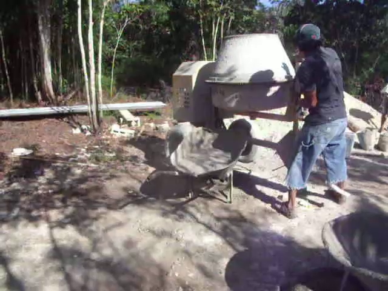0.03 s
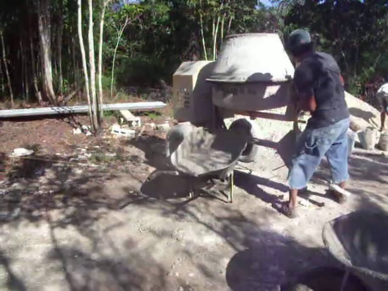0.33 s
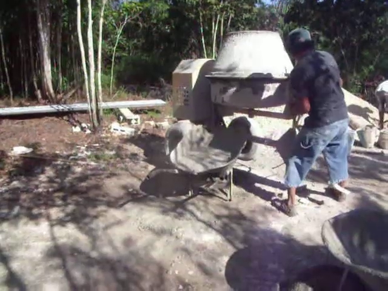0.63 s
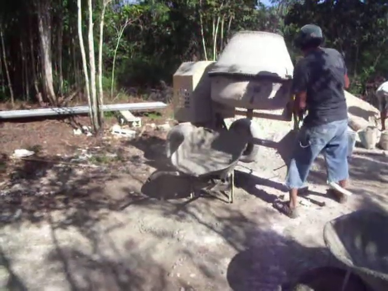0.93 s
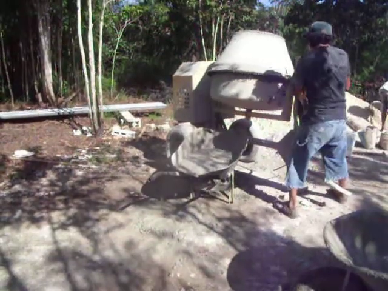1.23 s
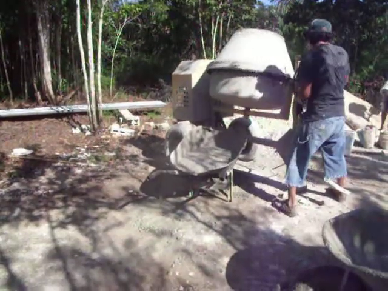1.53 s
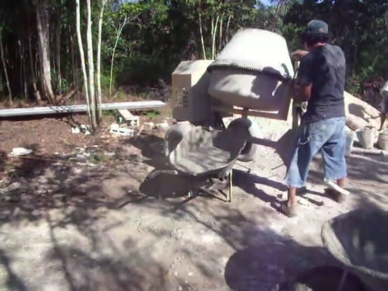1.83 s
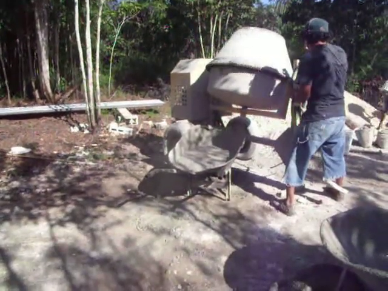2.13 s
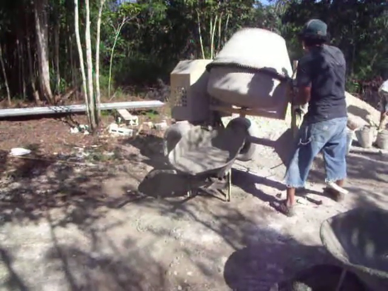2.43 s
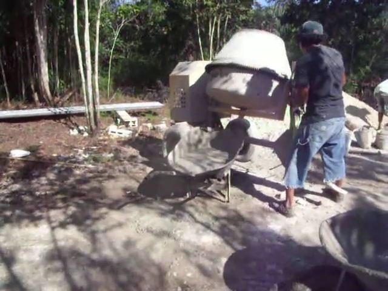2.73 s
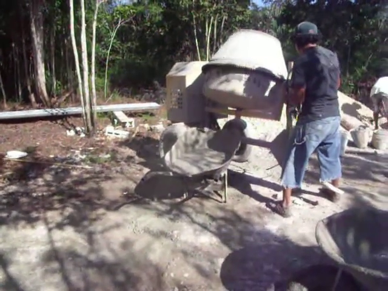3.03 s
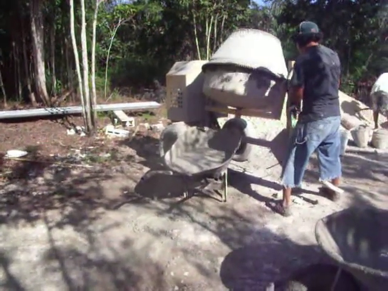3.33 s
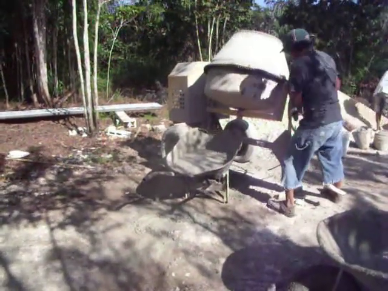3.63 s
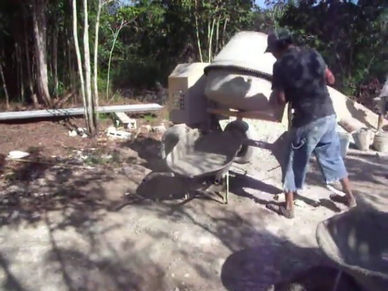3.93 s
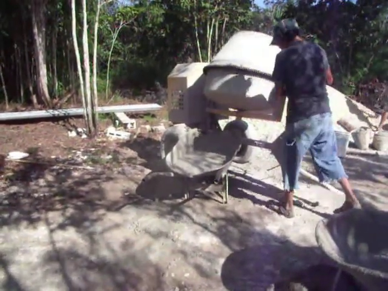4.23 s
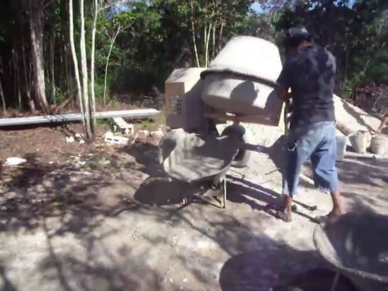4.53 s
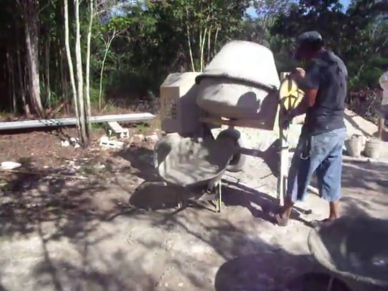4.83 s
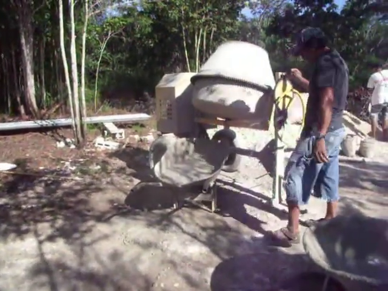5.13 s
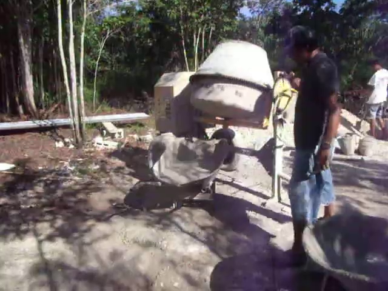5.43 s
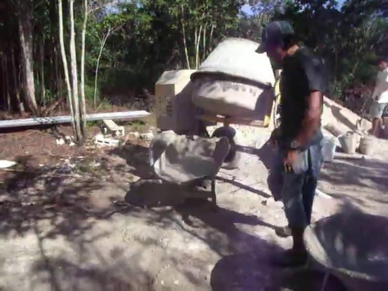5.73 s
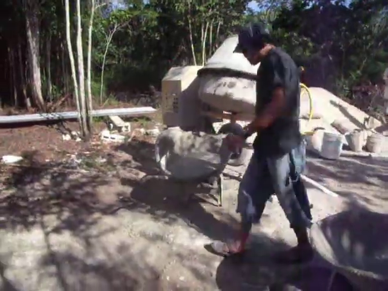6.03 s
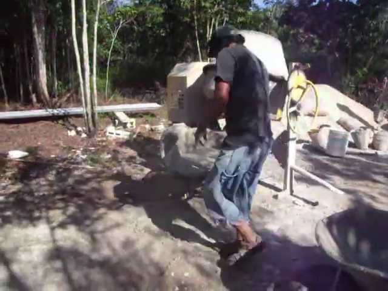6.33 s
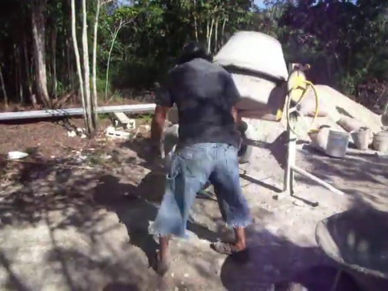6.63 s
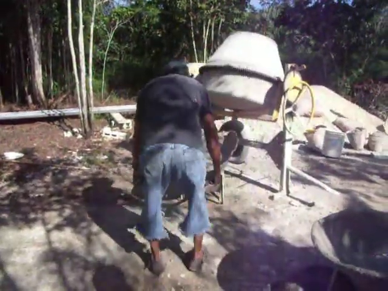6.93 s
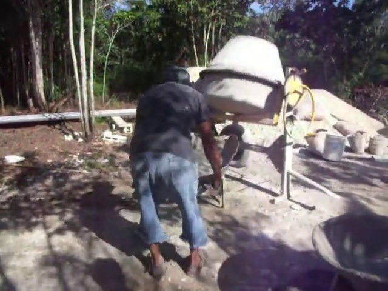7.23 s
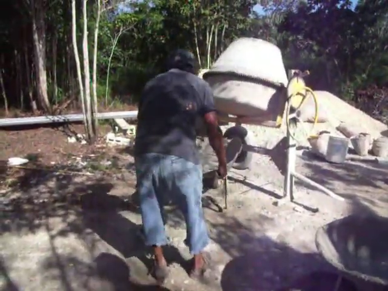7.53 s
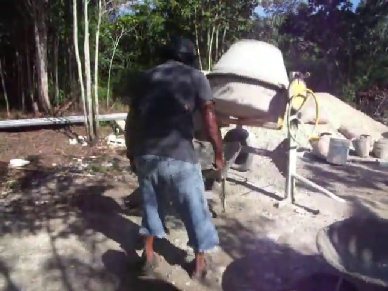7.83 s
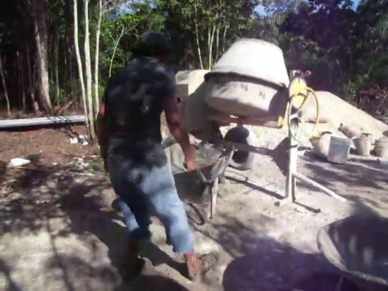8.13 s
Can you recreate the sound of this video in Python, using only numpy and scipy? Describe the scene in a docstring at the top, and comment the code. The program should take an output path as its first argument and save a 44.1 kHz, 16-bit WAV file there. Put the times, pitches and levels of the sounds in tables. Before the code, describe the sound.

The rapid, steady thud and tick of a small petrol engine turns a concrete mixer in the open air, over a faint low rumble. Dry metal clanks and rattles come unevenly from its ring gear. Roughly every three seconds the load shifts: gravel hisses over steel, then wet concrete slaps and lands with a deep rumble. One lump crashes hard against the drum, and a softer wet one follows later. The small microphone sounds slightly dull.

```python
"""First you hear the fast thud and tick of a one-cylinder petrol engine: a concrete mixer, outdoors.
Its loose ring gear, the toothed band that turns the steel drum, chatters and clanks.
As the drum turns, gravel slides, then wet concrete slops off the blades, thumps down and sets the
shell droning. Two lumps knock on the bare wall, and a low outdoor rumble lies under it all."""
import sys
import numpy as np
from scipy import signal
from scipy.fft import rfft, irfft
from scipy.io import wavfile
from scipy.ndimage import uniform_filter1d

SR = 44100
rng = np.random.default_rng(int(sys.argv[2]) if len(sys.argv) > 2 else 0)


def put_to_file(sound):
    """Save the sound as 16-bit audio at rate SR, in the file named by the first command-line argument."""
    columns = np.atleast_2d(sound).T  # one column per channel
    safe = np.clip(columns, -1, 1)
    whole_steps = np.round(safe * 32767)
    wavfile.write(sys.argv[1], SR, whole_steps.astype(np.int16))


N = 369558
T = np.arange(N) / SR


# Hum of the shaking frame: (multiple of the crank speed, level/dB before the load adds to it)
FRAME_HUM = [(2, -47), (4, -46.5), (5, -42), (6, -48), (9, -45)]
# Tone of the valve ticks: (f/Hz, relative level/dB)
VALVE_TONE = [(200, -10.5), (480, -4), (600, 2), (900, 0.5), (1120, 0), (1700, -1), (3100, -2.5),
              (3800, -7), (5300, -14)]
def engine(load_db=-24):
    """The engine thuds, hums, whines and ticks, and keeps the drum faintly ringing."""
    cycle = firing_count()
    crank = 2 * np.pi * 2 * cycle  # the crankshaft turns twice per firing
    hum = sum(level(np.sin(round(k) * crank + 0.45 * wander(5.2)) * undb(2.0 * wander(7.7)), db)
              for k, db in FRAME_HUM)
    teeth = 2 * np.pi * 37 * cycle  # 37 gear teeth meet per firing
    whine = level(np.sin(teeth + 1.4 * wander(14)) * undb(2.4 * wander(5.9)), -43.5)
    valves = np.exp(-((cycle - .24) % 1) / 0.56)  # jumps up and fades once a cycle
    ticks = grains(per_s=5000, spread_db=2) * (.7 + valves)
    clatter = through(level(ticks, -27.5), colour(VALVE_TONE))
    ringing = level(through(rng.standard_normal(N), steel(contact_db=-15.5)), -43.5)
    effort = 1 + landing() / undb(load_db)  # it beats harder as the load lands
    return (exhaust(cycle) + hum) * effort + whine + clatter + ringing


# Pitches at which the silencer booms: (f/Hz, width/Hz, relative level/dB)
SILENCER_BOOMS = [(61.5, 72, -9.5), (129.5, 140, 0.5), (197, 40, 5.5), (260, 60, -18)]
def exhaust(cycle, scatter_db=1.0, jitter_s=0.00033, puff_s=0.00089, lead_s=0.0019, echo_s=0.0158):
    """Each firing sends a soft puff of gas booming through the silencer; a weak echo follows."""
    firings = T[1:][np.diff(np.floor(cycle)) > 0]
    puffs, t = np.zeros(N), T[:SR // 50]
    for s, (late, size) in zip(firings, rng.standard_normal((len(firings), 2))):
        puff = -undb(scatter_db * size) * t * np.exp(-t / puff_s)
        start = s - lead_s + jitter_s * late
        add(puffs, start, puff)
        add(puffs, start + echo_s, undb(-11) * puff)
    boom = sum(undb(db) * signal.lfilter(*signal.iirpeak(hz, hz / width, fs=SR), puffs)
               for hz, width, db in SILENCER_BOOMS)
    return level(boom, -33.5)


# How often the engine fires: (t/s, f/Hz)
FIRING_RATE = [(0, 15.5), (.6, 15.41), (1.2, 15.34), (1.8, 15.62), (2.39, 15.34), (2.99, 15.43),
               (3.59, 15.3), (4.19, 15.44), (4.79, 15.43), (5.39, 15.5), (5.99, 15.22), (6.58, 15.47)]
def firing_count():
    """Count the engine's cycles so far, starting partway through one."""
    rate_hz = np.interp(T, *np.transpose(FIRING_RATE))
    return .18 + np.cumsum(rate_hz) / SR


# Blows of the ring gear on the small gear driving it: (loudest t/s, level/dB, favoured f/Hz)
TOOTH_BLOWS = [(0.5617, -17.5, 1940), (0.643, -17.5, 2040), (0.7828, -14.0, 1957), (0.8557, -18, 1920),
               (0.8832, -14, 2250), (0.9155, -12.5, 2130), (0.9647, -13.0, 2280), (0.98, -15.0, 2300),
               (0.991, -9.5, 2000), (0.997, -12.0, 2050), (1.1069, -18.5, 1940), (1.2283, -15.0, 1590),
               (1.413, -19.5, 1720), (1.4676, -18.5, 1850), (1.5387, -15, 1650), (1.9492, -16.5, 1800),
               (2.1153, -19.0, 1800), (2.14, -20, 1680), (2.217, -19.5, 1800), (2.2446, -19.0, 1630),
               (2.439, -19, 1680), (2.548, -15.5, 1970), (2.6805, -21.0, 1900), (2.9255, -17.5, 1950),
               (3.0159, -14.5, 1830), (3.0496, -20, 2040), (3.0845, -16, 1770), (3.1862, -19, 1740),
               (3.3211, -14, 2300), (3.4127, -17.0, 1700), (3.435, -17.5, 2030), (3.4998, -16.0, 1940),
               (3.567, -17, 2270), (3.581, -17.5, 2100), (3.6757, -17.0, 1900), (3.6942, -17, 1870),
               (3.7107, -15.5, 1960), (3.7734, -13.5, 1730), (3.8528, -16.5, 1810), (3.9705, -21.5, 1830),
               (4.1332, -20.5, 1830), (4.1625, -18.0, 2210), (4.1887, -16.0, 1820), (4.5526, -17.5, 1800),
               (4.7027, -11.0, 1610), (4.7199, -11.5, 2110), (4.848, -11, 1960), (4.935, -20.5, 1750),
               (4.9607, -19, 1900), (5.0599, -18.5, 1930), (5.138, -17.0, 1970), (5.36, -18.5, 1990),
               (5.4211, -15.0, 1600), (5.4918, -16.5, 1790), (5.4996, -17.5, 2050), (5.5267, -12.5, 1835),
               (5.5888, -17.5, 1770), (5.6311, -19.0, 2000), (5.7013, -19, 1740), (5.713, -13.0, 1670),
               (5.7815, -18, 1780), (6.0387, -16, 1730), (6.1056, -12.5, 2230), (6.1305, -17, 1820),
               (6.1515, -16, 2220), (6.3912, -17.0, 1770), (7.1112, -15.0, 1870), (7.1807, -19.5, 1770),
               (7.3153, -15.5, 2070), (7.3471, -16.5, 1930), (7.5768, -15.5, 1910), (7.7214, -17, 1940),
               (8.004, -13.0, 1810)]
def clanks(grind_s=.0022, lead_s=0.001005, settle_s=0.042, settle_db=-14, treble_hz=2700):
    """A gear tooth hits, grinds in for a few milliseconds and buzzes as it settles."""
    out, t, drum = np.zeros(N), T[:SR // 7], steel(contact_db=3.5)
    treble_filter = signal.butter(2, treble_hz, "high", fs=SR, output="sos")
    for s, db, hz in TOOTH_BLOWS:
        harder_db = db + 18  # compared with a middling blow
        rise_s = grind_s * np.exp(0.0924 * harder_db)  # harder blows grind longer
        grind = (t / rise_s * np.exp(1 - t / rise_s)) ** 2
        buzz = undb(settle_db) * np.exp(-t / settle_s)
        blow = through((grind + buzz) * rng.standard_normal(len(t)), drum)
        # each spot on the ring favours its own pitch
        spot = signal.lfilter(*signal.iirpeak(hz, Q=5.4, fs=SR), blow)
        # harder and higher blows sound brighter
        bright_db = 0.5 + 0.22 * harder_db + 4 * np.log2(hz / 1850)
        treble = signal.sosfiltfilt(treble_filter, blow)
        blow = blow + 1.8 * spot + (undb(bright_db) - 1) * treble
        strength = np.std(blow[:SR // 83])  # over the first 12 ms
        add(out, s - rise_s - lead_s, blow * undb(db) / strength)
    return out


# Bursts of gear chatter: (start t/s, length/s, level/dB)
CHATTER_BURSTS = [(0.283, 0.086, -28), (0.536, 0.11, -28), (0.972, 0.283, -23.5), (1.433, 0.21, -25.5),
                  (1.707, 0.2, -27.5), (2.05, 0.23, -29.5), (2.458, 0.1, -25), (2.832, .29, -25),
                  (3.394, 0.37, -24.5), (4.54, 0.2, -25.5), (4.92, .2, -29), (5.426, 1.11, -26),
                  (6.63, 0.3, -31.5), (7.2, 0.26, -27), (8.162, .11, -24)]
def chatter(scrape_s=.002, jolt_db=1.5, rise_s=0.011, fade_s=0.023, steady_db=-35):
    """Loose teeth scrape lightly and rattle the drum: softly all the time, louder in bursts."""
    jolt = undb(jolt_db * np.cos(2 * np.pi * (firing_count() - 0.11)))  # each firing shakes the gear
    taps = np.abs(grains(per_s=200, spread_db=4.0)) * jolt
    scrapes = through(taps, np.exp(-T[:SR // 20] / scrape_s)) * rng.standard_normal(N)
    rattle = level(through(scrapes, steel(contact_db=-25.5)))
    bursts, t = np.zeros(N), T[:SR * 2]
    for s, length, db in CHATTER_BURSTS:
        rise = np.minimum(t / rise_s, 1)
        fade = np.exp(-np.maximum(t - length, 0) / fade_s)
        add(bursts, s, undb(db) * rise * fade)
    return rattle * np.hypot(bursts, undb(steady_db))


# Ringing notes of the drum and gear: (f/Hz, relative level/dB, time to fade by 60 dB/s)
STEEL_NOTES = [(570, -22, .16), (904, -20, .1), (1248, -21, .13), (1537, -4, .075), (1610, -3, .035),
               (1705, -2, .028), (1841, -3, .05), (1970, 0, .028), (2142, -6, .035), (2272, -7, .06),
               (2420, -10, .055), (2659, -12, .05), (2835, -17, .085), (3090, -6, .028), (3283, -17, .06),
               (3531, -12, .03), (3755, -16, .05), (4231, -17, .028)]
# Tone of steel hitting steel: (f/Hz, relative level/dB)
CRACK_TONE = [(200, -32.5), (1100, -5.5), (1400, 4), (1580, 8.5), (2200, 0), (2600, 2), (3700, -2),
              (5500, -15.5)]
def steel(contact_db):
    """One tap on the drum gives a dry crack and many fading notes."""
    t = T[:SR // 5]
    ring = sum((-1) ** k * undb(db) * np.sin(2 * np.pi * hz * t) * np.exp(-np.log(1000) * t / fade_s)
               for k, (hz, db, fade_s) in enumerate(STEEL_NOTES))
    crack = colour(CRACK_TONE)
    return ring / np.linalg.norm(ring) + undb(contact_db) * np.pad(crack, (0, len(t) - len(crack)))


# The load lands and rolls on: (start t/s, length/s, thump level/dB, rumble level/dB)
LANDINGS = [(.62, 0.58, -35.5, -34), (3.24, 0.5, -36, -31.5), (5.376, 0.42, -38, -35),
            (5.865, 0.64, -35, -26), (7.095, 0.27, -40, -33.5)]
# Tone of the rolling load: (f/Hz, relative level/dB)
RUMBLE_TONE = [(40, -17.5), (140, -4), (192, 2), (235, -3.5), (315, 4.5), (390, -2.5), (470, -11.5),
               (900, -40)]
def rumble(turn_s=2.8, first_lift_s=0.65, rolling_db=-31.5, lift_db=2.5, roll_on_s=0.086):
    """Lumps roll in the hollow drum, louder after a landing and as a blade lifts them twice a turn."""
    lift = np.cos(2 * np.pi * 2 * (T - first_lift_s) / turn_s)
    rolls = [(s, length + roll_on_s, db) for s, length, _, db in LANDINGS]
    loudness = undb(rolling_db + lift_db * lift) + swells(rolls, skew=0.79, fullness=0.48)
    return through(grains(per_s=1400, spread_db=1.5), colour(RUMBLE_TONE)) * loudness


def landing():
    """How hard the load is hitting the bottom of the drum at each moment."""
    return swells([(s, length, db) for s, length, db, _ in LANDINGS])


# Tone of the landing load: (f/Hz, relative level/dB)
THUMP_TONE = [(25, -13.5), (65, 14.5), (130, -8), (600, -43.5)]
def thumps():
    """The heavy load drops with a deep boom."""
    return through(grains(per_s=530, spread_db=2.5), colour(THUMP_TONE)) * landing()


# Spills of wet concrete: (start t/s, length/s, level/dB)
SPILLS = [(.52, 0.98, -26.5), (1.95, 0.17, -29.5), (3.16, 0.089, -23), (3.24, 0.14, -18.5),
          (3.4, 0.11, -19), (3.5, 0.44, -26), (5.75, 0.25, -28), (5.8, 0.92, -26.5), (5.97, 0.12, -23)]
# Tone of a wet slap: (f/Hz, relative level/dB)
WET_TONE = [(250, -24), (780, -2), (1200, -8), (2000, -6.5), (5000, -27.5)]
def slops():
    """Wet concrete falls off the blades in many tiny slaps."""
    return through(grains(per_s=1800, spread_db=1.0), colour(WET_TONE)) * swells(SPILLS)


# Gravel sliding down the wall: (start t/s, length/s, level/dB before the flicker)
GRAVEL_SLIDES = [(.25, 0.59, -31), (.5, 0.27, -31), (1.6, 0.61, -33.5), (2.66, 0.27, -24),
                 (2.89, 0.23, -22.5), (3.05, 0.9, -32.5), (5.33, 0.085, -24.5), (5.7, 0.7, -31)]
# Tone of small stones on steel: (f/Hz, relative level/dB)
GRAVEL_TONE = [(1000, -4.5), (2200, -5.5), (3200, 2), (5500, -10)]
def gravel():
    """Stones slide over the steel with a flickering hiss."""
    stones = through(grains(per_s=2200, spread_db=3.5), colour(GRAVEL_TONE))
    flicker = undb(2.9 * wander(35))
    return stones * flicker * swells(GRAVEL_SLIDES)


# Lumps hitting the bare wall: (t/s, peak level/dB, stoniness from 0 to 1)
LUMP_HITS = [(2.742, 1, 0.87), (5.789, -6.5, 0.03)]
# Tone of a stony lump crashing on steel: (f/Hz, relative level/dB)
CRASH_TONE = [(90, -24), (350, 6), (460, -1.5), (730, 1.5), (1600, -23), (2200, -10), (3600, 4),
              (5500, -14)]
def knocks(rise_s=0.0065, ring_db=1, treble_hz=2700):
    """A wet lump lands dully; a stony one booms, sprays stones and rings the drum's high notes."""
    out, t = np.zeros(N), T[:SR // 5]
    push = t / rise_s * np.exp(1 - t / rise_s)
    treble_filter = signal.butter(4, treble_hz, "high", fs=SR, output="sos")
    ring = signal.sosfilt(treble_filter, steel(contact_db=-19))
    ring /= np.linalg.norm(ring)
    for s, db, stony in LUMP_HITS:
        stones = push * rng.standard_normal(len(t))
        lump = (1 - stony) * colour(WET_TONE) + stony * colour(CRASH_TONE)
        blow = through(stones, lump) + stony * undb(ring_db) * through(stones, ring)
        add(out, s, blow * undb(db) / np.abs(blow).max())
    return out


# Drones as the load shifts: (start t/s, length/s, multiple of the crank speed, level/dB)
SHELL_DRONES = [(0.67, .6, 2, -39), (3.2, 0.55, 2, -38), (3.244, 0.36, 4, -30.5), (3.584, 0.34, 6, -29.5),
                (6.275, .3, 6, -31)]
def shell():
    """The crankshaft shakes the loaded drum into short, clean notes."""
    crank = 2 * np.pi * 2 * firing_count()
    return sum(np.sqrt(2) * np.sin(round(k) * crank) * swells([(s, length, db)])
               for s, length, k, db in SHELL_DRONES)


# Tone of the outdoor background: (f/Hz, relative level/dB)
AIR_TONE = [(20, -13.5), (45, -5), (100, -6.5), (1000, -38.5)]
def air():
    """A low, steady outdoor rumble."""
    return level(through(rng.standard_normal(N), colour(AIR_TONE)), -39.5)


def undb(db):
    """Turn decibels into a number to multiply by."""
    return 10 ** (np.asarray(db) / 20)


def level(x, db=0):
    """Set a sound's average (rms) level."""
    return x * undb(db) / np.sqrt(np.mean(x ** 2))


def swells(rows, skew=0.7, fullness=0.93):
    """Loudness that rises and falls in an arch for each (start t/s, length/s, level/dB) row."""
    out = np.zeros(N)
    for s, length, db in rows:
        progress = np.linspace(0, 1, int(length * SR))
        add(out, s, undb(db) * np.abs(np.sin(np.pi * progress ** skew)) ** fullness)
    return out


def through(x, response):
    """Play a sound through an object, given the object's response to one click."""
    return signal.oaconvolve(x, response)[:len(x)]


def colour(points, size=4096):
    """Make a click whose tone follows the (f/Hz, relative level/dB) points."""
    hz, db = np.transpose(points)
    grid_hz = np.arange(size // 2 + 1) * SR / size + 1
    gain = undb(np.interp(np.log(grid_hz), np.log(hz), db))
    # move the energy to the start of the click, keeping its tone
    cepstrum = irfft(np.log(gain))
    cepstrum[1:size // 2] *= 2
    cepstrum[size // 2 + 1:] = 0
    response = irfft(np.exp(rfft(cepstrum)))
    return response / np.linalg.norm(response)


def wander(per_s):
    """A smooth random drift that heads for a new value per_s times a second."""
    hold = int(SR / per_s)
    steps = np.repeat(rng.standard_normal(N // hold + 1), hold)[:N]
    return level(uniform_filter1d(uniform_filter1d(steps, hold), hold))


def grains(per_s, spread_db):
    """Tiny hits of uneven size at random moments."""
    chance, size, sign = rng.random(N), rng.standard_normal(N), rng.choice([-1, 1], N)
    return level((chance < per_s / SR) * sign * undb(spread_db * np.minimum(size, 2)))


def add(track, s, sound):
    """Mix a short sound into a track at s seconds."""
    start = max(int(s * SR), 0)
    track[start:start + len(sound)] += sound[:max(N - start, 0)]


def scene():
    """The mixer and its load in the open air, in one channel."""
    machine = engine() + shell() + chatter()
    concrete = rumble() + thumps() + slops() + gravel() + knocks()
    return (machine + concrete + clanks() + air())[None]


def record(dry, mic_limit=.8, band_hz=5600, overload=.72, top_hz=15800):
    """A small microphone dulls the treble; the hardest hits overload it before and after its filter."""
    limited = np.clip(dry, -mic_limit, mic_limit)
    treble_cut = signal.firwin(121, band_hz, window=("kaiser", 8), fs=SR)
    dulled = signal.fftconvolve(limited, treble_cut[None], "same")
    clipped = np.clip(dulled, -overload, overload)
    return signal.sosfilt(signal.ellip(8, .2, 70, top_hz, fs=SR, output="sos"), clipped)


dry = scene()
out = record(dry)
put_to_file(out)
```